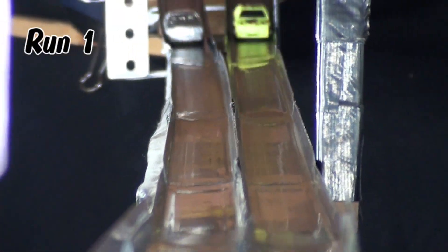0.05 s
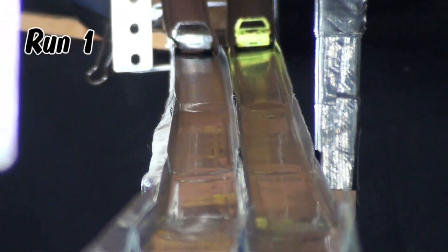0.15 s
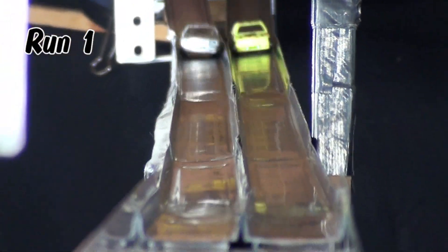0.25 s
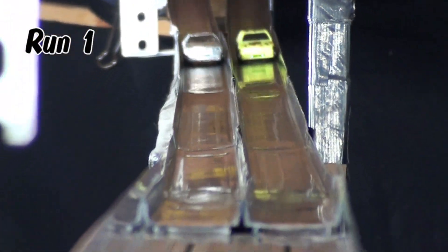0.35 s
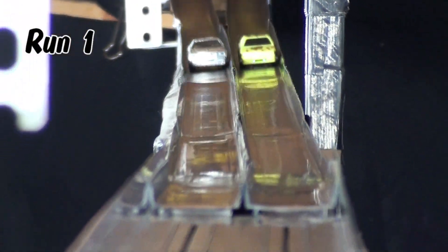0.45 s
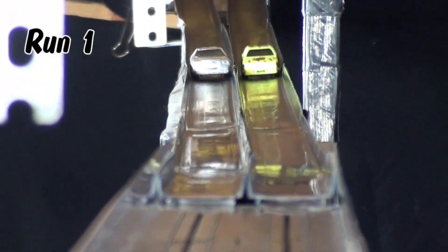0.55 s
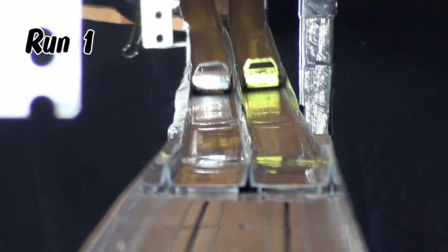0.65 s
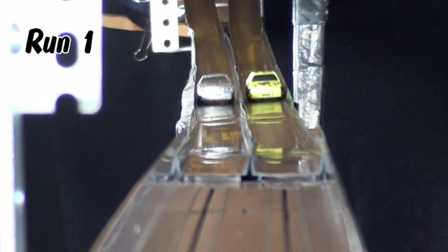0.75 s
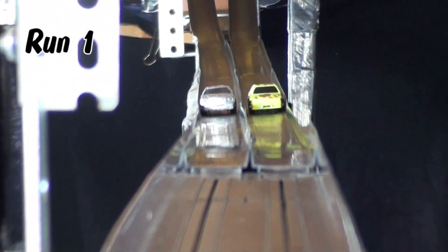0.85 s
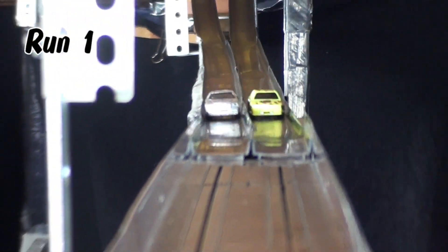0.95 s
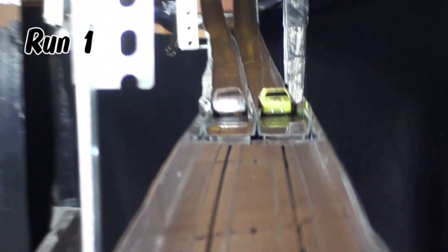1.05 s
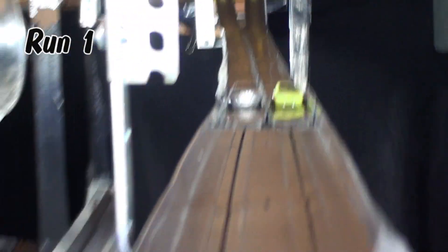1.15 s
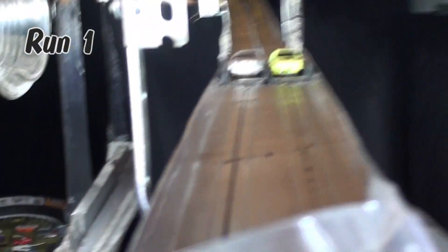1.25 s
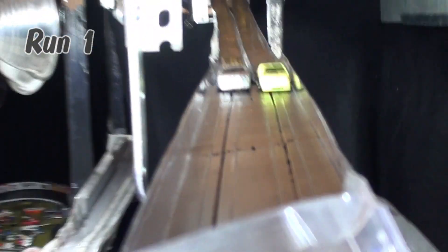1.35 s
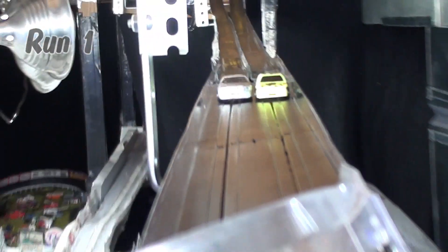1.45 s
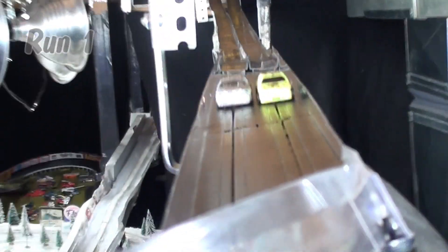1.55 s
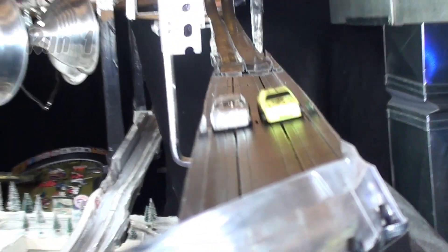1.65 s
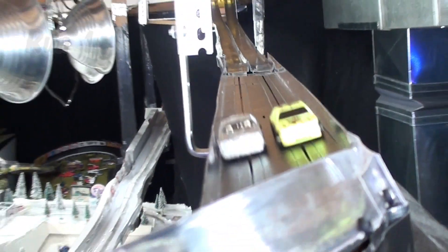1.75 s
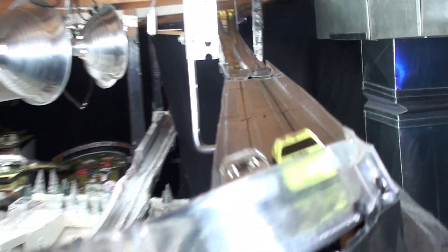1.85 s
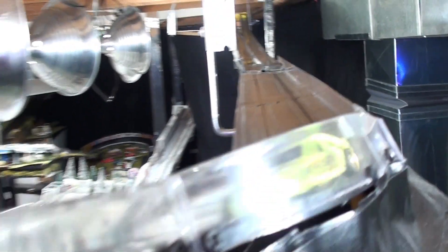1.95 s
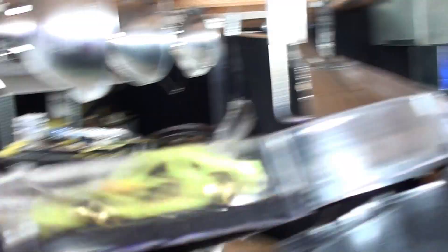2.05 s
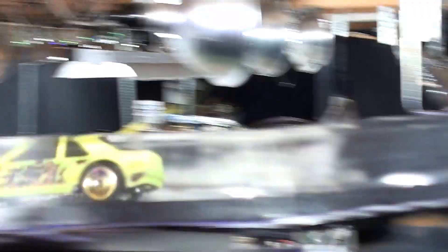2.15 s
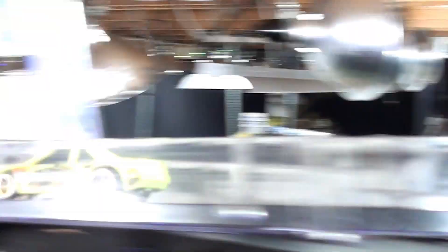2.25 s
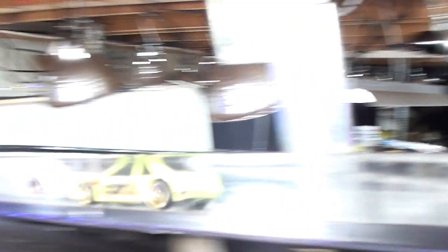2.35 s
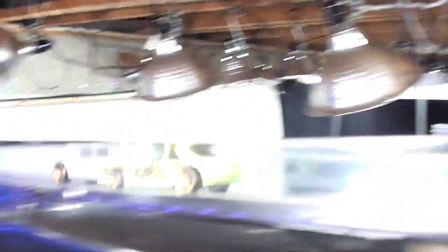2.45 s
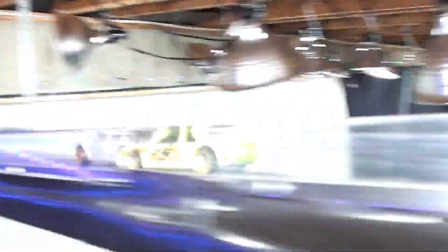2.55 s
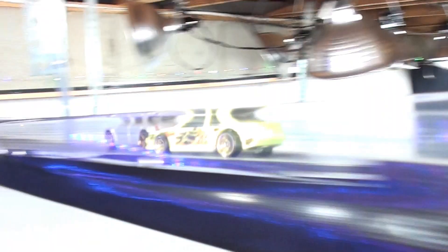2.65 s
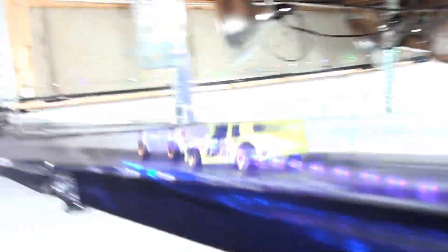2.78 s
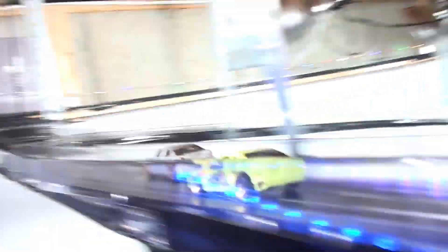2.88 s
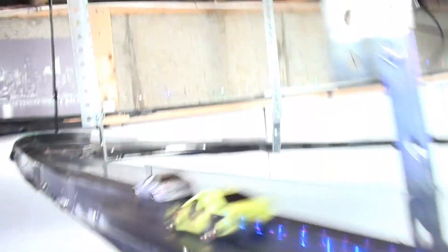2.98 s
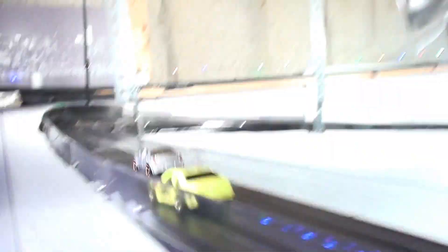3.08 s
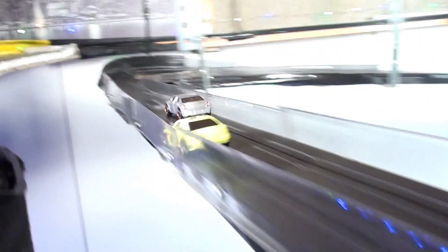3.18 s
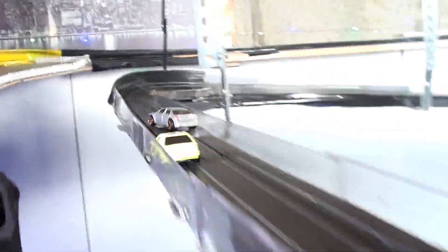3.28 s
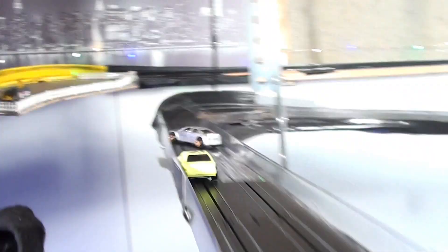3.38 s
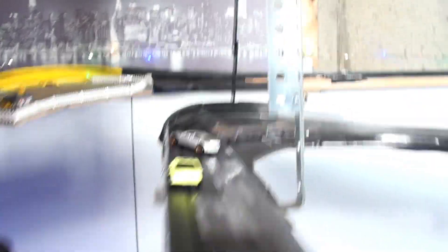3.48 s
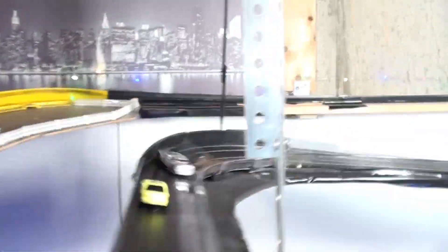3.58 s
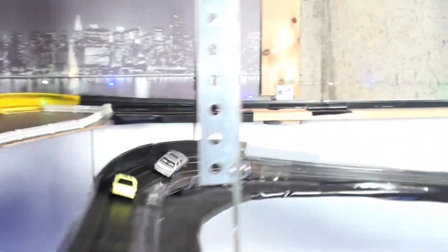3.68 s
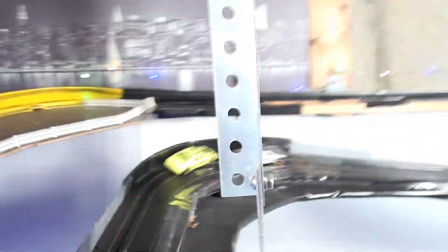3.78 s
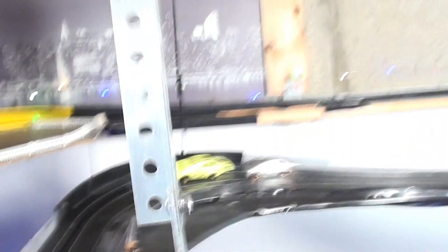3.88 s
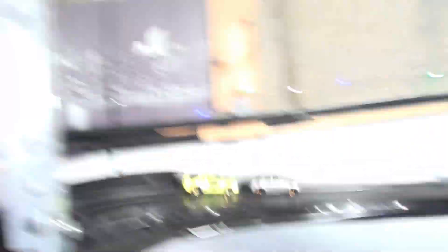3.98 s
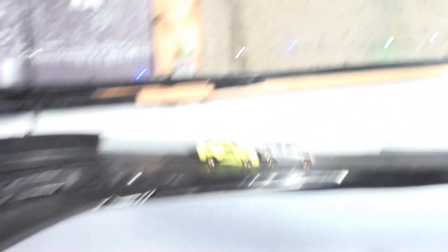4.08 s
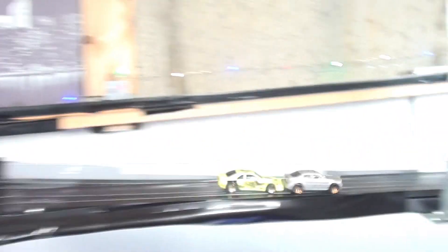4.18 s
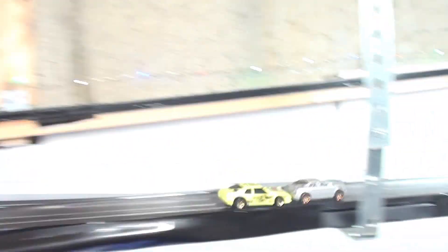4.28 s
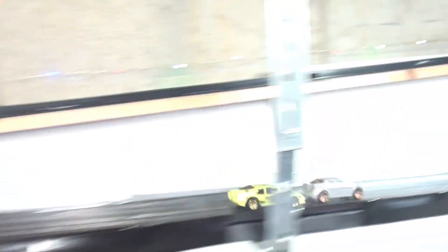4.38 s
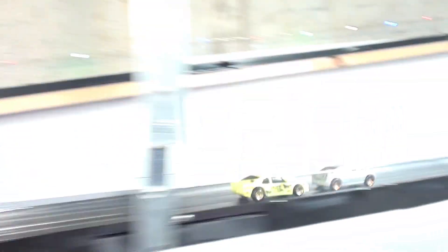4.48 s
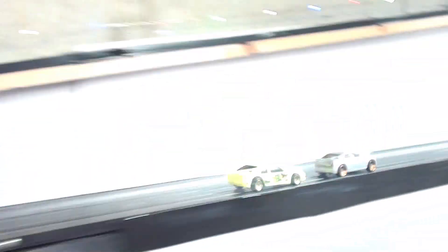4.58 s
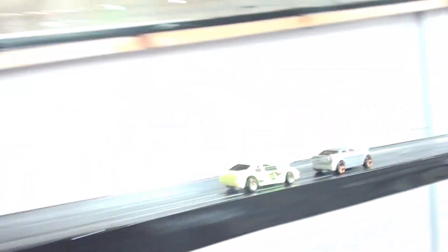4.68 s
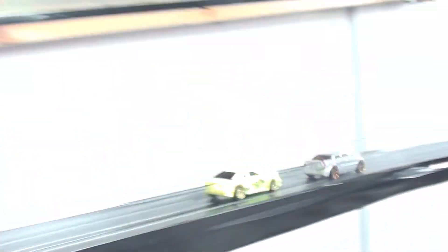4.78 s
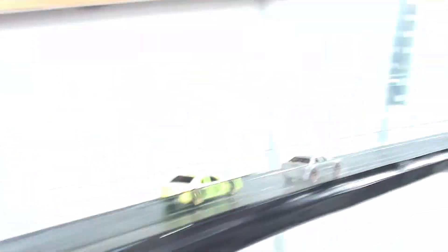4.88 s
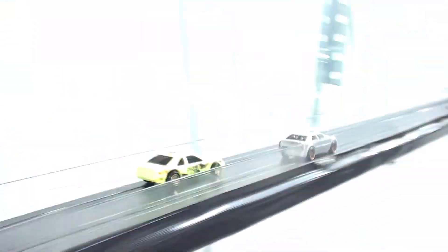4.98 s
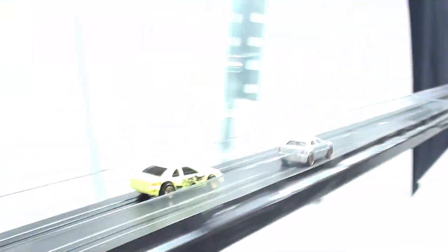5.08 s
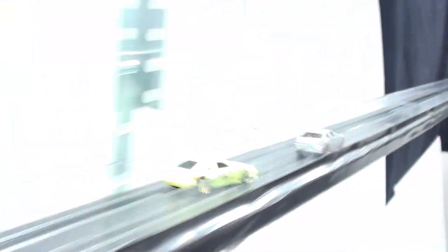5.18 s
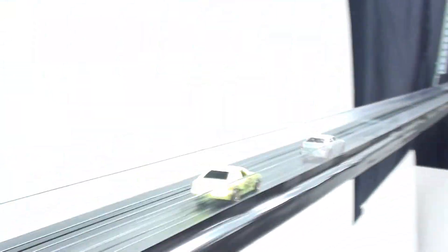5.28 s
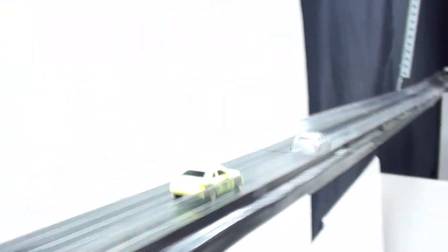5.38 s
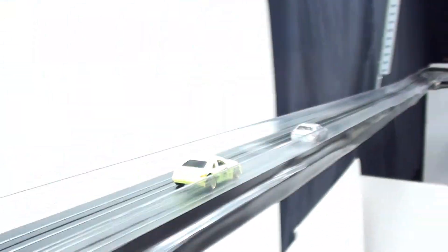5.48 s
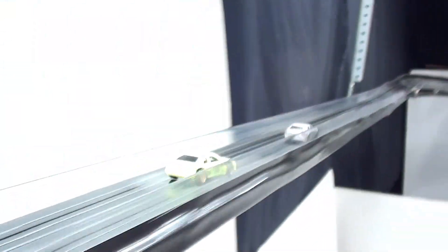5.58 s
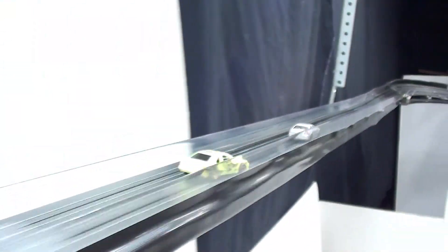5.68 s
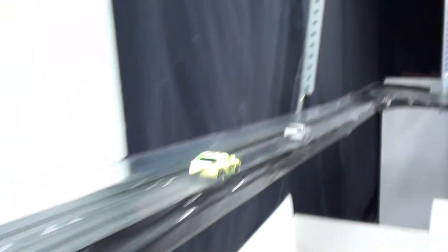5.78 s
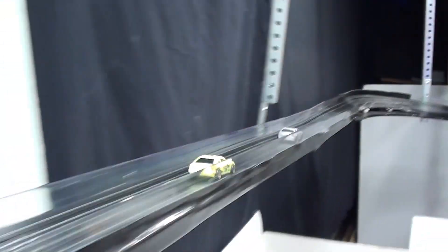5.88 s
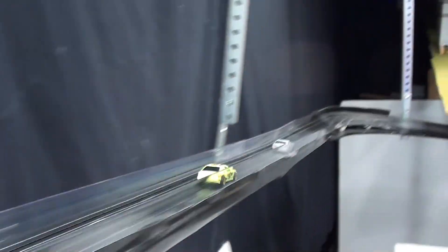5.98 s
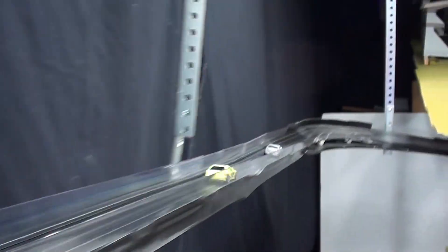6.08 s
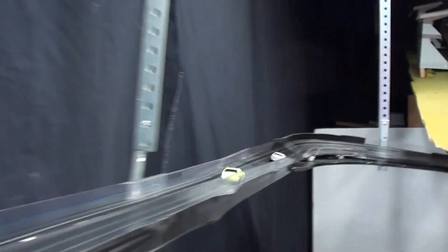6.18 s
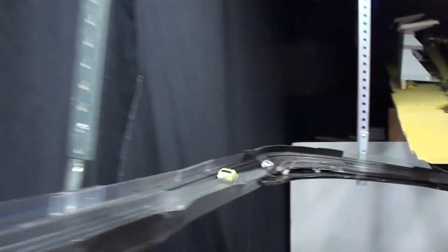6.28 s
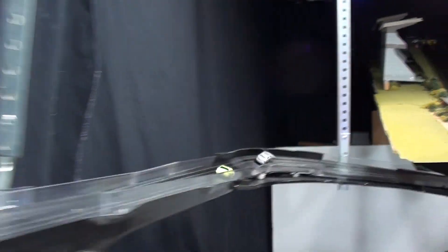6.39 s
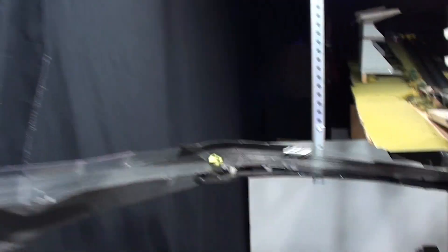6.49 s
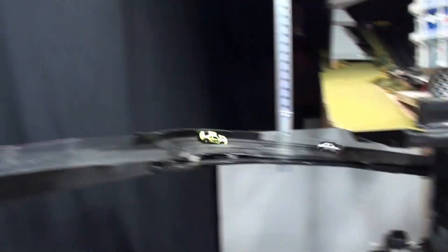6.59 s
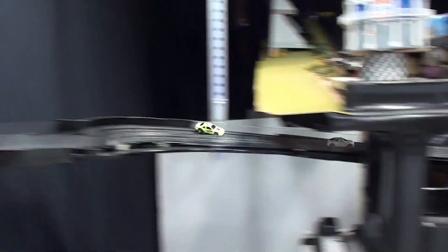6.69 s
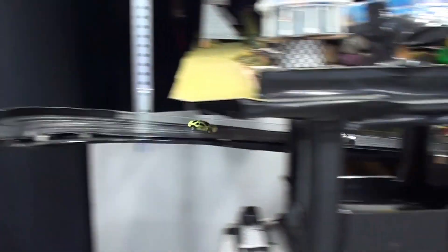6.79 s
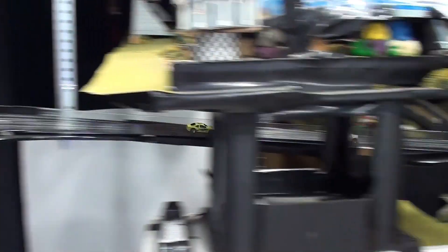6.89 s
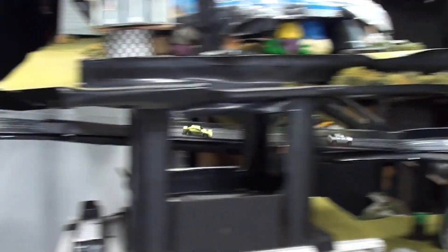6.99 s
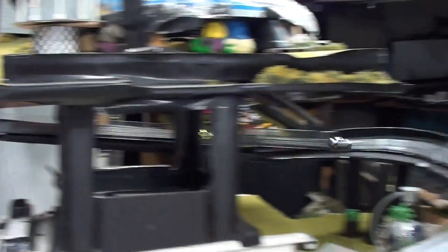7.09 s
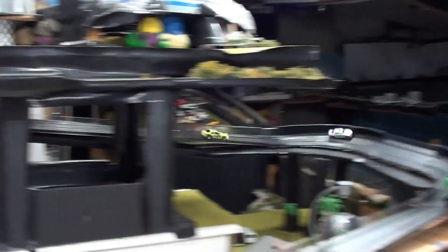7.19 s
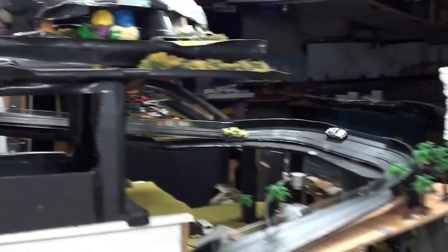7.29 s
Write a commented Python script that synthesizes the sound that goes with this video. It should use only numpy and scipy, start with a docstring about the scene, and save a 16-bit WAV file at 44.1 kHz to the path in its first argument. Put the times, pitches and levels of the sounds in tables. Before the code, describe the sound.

Two small diecast cars run down a plastic track indoors, picked up closely by a small microphone with little bass. From 0 to 1.4 seconds the roll is quiet, rattly and ringing, with a small double tick near 0.3, a soft thump at 0.85 and separate clicks from 1.1 to 1.45. Around 1.4 the gritty hiss jumps up and becomes a strong, bright stream. Between 2.0 and 2.3 a bend brings a rapid burst of ticks, knocks and brief gaps as the hiss dips. It runs full and smoother, loudest near 2.9, until a second bend at 3.6 to 4.05, with another dense clicking cluster. A clearer low thump comes at 4.4. The steady hiss then carries on with shifting hollow resonance, sparse ticks at 6.2, 6.5, 6.65 and 6.95, and a dull knock and slight dip near 7.25, still rolling at the end around 7.3. Faint lumpy stand rumble lies underneath.

```python
"""Indoors, two small diecast cars roll down a plastic track, heard from close behind.
Tiny wheel impacts make a gritty hiss that rings the track pieces; hops briefly cut it.
Bursts of tuned ringing make the axle ticks and car knocks, and now and then a soft thump of the stand.
Low, lumpy noise is the rumble of the stand, which shudders after each thump."""
import sys
import numpy as np
from scipy import signal
from scipy.io import wavfile
from scipy.ndimage import uniform_filter1d

SR = 44100
rng = np.random.default_rng(int(sys.argv[2]) if len(sys.argv) > 2 else 0)


def materialize(psi):
    """Save the field psi as 16-bit PCM at rate SR to the path in sys.argv[1].

    A 1-D psi becomes a single channel; in a 2-D psi each row is a channel.
    """
    bounded = np.clip(np.atleast_2d(psi).T, -1, 1)
    quanta = np.round(bounded * 32767).astype(np.int16)
    wavfile.write(sys.argv[1], SR, quanta)


N = 323694  # length in samples

# Ticks of the axles and track joints. Each row: start in seconds, peak of the tick in dB
# before its crack is added, level of the low knock in dB against that peak.
TICK_EVENTS = [(0.286, -23, -23), (0.321, -24, -20), (1.0755, -15, -10), (1.1924, -21, -17),
               (1.3103, -28, -9), (1.445, -15, -16), (2.012, -24, -8), (2.022, -14, -14),
               (2.064, -14.5, -11), (2.105, -15.5, -18), (2.12, -16, -11), (2.135, -24, -7),
               (2.151, -24, -12), (2.175, -22, -6), (2.2145, -21, -12), (2.255, -29, -5),
               (3.7905, -19, -17), (3.8143, -26, -13), (3.881, -17, -11), (3.898, -25, -18),
               (3.903, -19, -19), (3.929, -17, -7.5), (3.951, -31, 2), (3.975, -29, 3.5), (3.986, -32, -12),
               (4.0087, -13, -33), (4.0239, -23.5, -1), (4.052, -22, -6), (6.192, -20, -22),
               (6.5207, -14, -20), (6.654, -21.5, -4), (6.9398, -15.5, -28), (7.2512, -30, 10.5)]
# Jolts of the stand under the track. Each row: start in seconds, peak of its ring in dB before the soft rise,
# starting level of the body shudder in dB, the same for the deep sway in dB, shudder length in seconds.
STAND_JOLTS = [(0.298, -46, -50, -54, 0.095), (0.847, -23, -43, -55, .09), (1.41, -35, -47.5, -57, 0.17),
               (2.042, -42, -42.5, -57, 0.2), (3.65, -29, -45, -66, 0.13), (3.803, -30, -49, -61, 0.1),
               (4.409, -10, -40.5, -75, 0.06), (5.292, -50, -51, -62, .13), (6.434, -51, -42.5, -75, 0.17),
               (6.664, -42, -41.5, -75.5, 0.12), (6.96, -44, -44, -68, 0.071),
               (7.22, -34.5, -41, -77, 0.11)]

RAMP_END_S, RAMP_RATTLE = 1.6, 0.5  # end of the steep first ramp, and its share of chatter (0-1)
# Later chatter starts from a base share, grows with time as the cars slow, and rises in bends.
FLAT_RATTLE, RATTLE_PER_S, BEND_RATTLE = 0.16, 0.06, 0.8
BEND_SAG_DB, BEND_EXIT_S = -9.5, 0.11  # roll drop at full lean; time to run free after a bend
SHUDDER_RISE_S, SHUDDER_DB_PER_S = 0.01, -35
SETTLE_DB_PER_S = -300  # extra fading once the shudder length is over
DEEP_HZ = 91  # below it the whole frame of the stand sways
EDGE_HZ = 15850  # upper limit of the sound


def gain_of(db):
    """Turns decibels into amplitude."""
    return 10 ** (np.asarray(db) / 20)


def evened(x):
    """Scales a sound to an rms level of 1."""
    return x / np.sqrt(np.mean(x ** 2) + 1e-20)


def read(points, hz):
    """Reads a spectrum table at the given frequencies, with straight lines on a log scale."""
    f, value = np.transpose(points)
    return np.interp(np.log(hz + 1), np.log(f + 1), value)


def follow(rows, t):
    """Reads every column of a time table at the given times."""
    s, *columns = np.transpose(rows)
    return [np.interp(t, s, c) for c in columns]


def add(mix, s, sound):
    """Mixes a sound in at time s."""
    part = mix[round(s * SR):][:len(sound)]
    part += sound[:len(part)]


def wander(shape, size):
    """Makes smoothed random values of rms 1; size sets the patch extent along each axis."""
    x = rng.standard_normal(shape)
    for axis, n in enumerate(size):
        x = uniform_filter1d(x, n, axis=axis)
        x = uniform_filter1d(x, n, axis=axis)
    return evened(x)


def pair(first, second, hz, lean=0, spread_db=0):
    """Makes left and right spectra from a shared part plus and minus a side part that may lean to the left."""
    # Stereo width. Each row: frequency in Hz, side against middle in dB before spread_db is added.
    width = [(160, -30), (450, -18.5), (2000, -5), (3300, -9), (7000, -6.5), (8800, -17), (11000, -78)]
    side_gain = gain_of(read(width, hz)[:, None] + spread_db)
    side = side_gain * (second + lean * first)
    return np.array([first + side, first - side])


def rolling(patchy_db=1.96, drift_db=0.92, lean_per_db=0.3, airy_per_db=1.26):
    """Lets the contacts ring the track; its hollow lows and the wheel fizz change from piece to piece."""
    # Loudness of the roll. Each row: time in seconds, rolling level in dB before bends lower it,
    # hollow lows in dB and wheel fizz in dB, both against the rolling level.
    roll_levels = [(0, -53.5, 0.5, 3.5), (0.26, -44, -1, -5), (0.32, -39.5, -4, 0), (0.5, -42, -0.5, -4.5),
                   (0.9, -41, 1, -2), (1.04, -37.5, -2.5, -3), (1.1, -44, 0, -5), (1.398, -41.5, -0.5, -1),
                   (1.408, -32, -9.5, -0.5), (1.62, -27.5, -5.5, -3), (1.95, -29.5, -5, 0),
                   (2.26, -29, -6.5, -1), (2.45, -30, -3.5, -6), (2.9, -26.5, -6.5, -7),
                   (3.27, -30.5, -5.5, -1.5), (3.6, -29, -6.5, -2), (4.08, -32, -2, -1),
                   (4.2, -29, -3, -4.5), (4.85, -30, 0.5, -3.5), (5.05, -28, -8, -4.5),
                   (5.6, -31, -2.5, -1), (6.0, -29.5, -4.5, -1), (6.5, -31.5, -7, 1),
                   (7.24, -31.5, -7, -3.5), (7.26, -36, 3, 1), (7.34, -32.5, -1.5, 0)]
    # Tone of the roll before the rings and patches. Each row: frequency in Hz, level in dB per Hz.
    roll_colour = [(240, -43), (400, -24), (588, -22), (947, -8), (1480, -1), (2350, 0.5), (2950, 2),
                   (4350, 0), (4880, -2.5), (5450, 0), (7440, -3), (9510, -11.5), (15800, -34.5)]
    # Place of the roll between the ears. Each row: time in seconds, pull to the left in dB before
    # lean_per_db scales it, change of the stereo width in dB.
    aim = [(0, 0.5, -5), (1.6, -0.5, -11), (2.3, 1.5, -9.5), (2.8, -2, -8.5), (4.2, 0.7, -7),
           (5.6, 1.1, -7), (7.34, 0.0, -6.5)]
    hz, t, (track, wheels, axles) = signal.stft(contacts(), SR, nperseg=512, noverlap=384)
    level_db, hollow_db, fizz_db = follow(roll_levels, t)
    level_db = level_db + BEND_SAG_DB * lean_on_wall(t) ** 2

    low = 1 / (1 + (hz / 2300) ** 6)
    high = 1 / (1 + (5200 / (hz + 1)) ** 8)
    top = 1 / (1 + (7800 / (hz + 1)) ** 8)
    # axle snaps own the top of the fizz
    wheels = wheels * np.sqrt(1 - top)[:, None] + axles * top[:, None] ** 2

    rings = np.sqrt(track_ring(hz, t))
    shape = gain_of(read(roll_colour, hz))[:, None] * rings
    patches_db = patchy_db * wander(shape.shape, size=[2, 8]) / rings  # a ringing piece is steadier
    slow_db = drift_db * wander(shape.shape, size=[3, 50])
    shape *= gain_of(patches_db + slow_db)
    octaves_up = np.log2(np.maximum(hz / 6000, 1))[:, None]
    shape *= gain_of(airy_per_db * (fizz_db + 5.0) * octaves_up)  # strong fizz is also airier

    layers = (
        (1 - low - high, level_db, track),
        (low, level_db + hollow_db, track),
        (high, level_db + fizz_db, wheels),
    )
    sound = 0
    for part, db, drive in layers:
        tone = part[:, None] * shape
        steady = np.sqrt(uniform_filter1d((tone ** 2).mean(0), size=60))
        sound = sound + drive * tone / steady * gain_of(db)
    lean_db, spread_db = follow(aim, t)
    both = pair(*sound, hz, lean_per_db * lean_db, spread_db)
    return signal.istft(both, SR, nperseg=512, noverlap=384)[1][:, :N]


def contacts(chatter_db=3.5, bumps_per_s=300, bump_db=-1, bump_s=0.0014, track_share=0.61,
             press=0.82, press_s=0.0055, wheel_share=0.92, snap_share=1.8):
    """Drives the grit with bumps that die away; the heavy track follows least, the light axles most."""
    # Wheels leave the track for a moment. Each row: start in seconds, length in seconds, drop in dB.
    hops = [(1.042, 0.034, 3), (1.39, 0.014, 6.5), (2.079, 0.011, 5.5), (2.142, 0.0057, 9),
            (2.169, 0.017, 5.5), (2.218, 0.03, 4), (3.805, 0.0085, 8), (3.844, 0.0074, 1),
            (3.875, 0.008, 5), (4.044, 0.008, 4), (6.189, 0.027, 4.5), (6.511, 0.018, 2),
            (7.252, 0.0024, 15)]
    t = np.arange(N) / SR
    smooth = np.where(t < RAMP_END_S, RAMP_RATTLE, FLAT_RATTLE + RATTLE_PER_S * t)
    rattle = np.clip(smooth + BEND_RATTLE * lean_on_wall(t), 0, 1)

    hits = rng.random(N) < rattle ** 2 * bumps_per_s / SR
    strength = np.minimum(rng.exponential(1, N), 1.6)
    bumps = hits * strength * np.sqrt(rattle)
    fade_t = np.arange(2000) / SR
    swell = signal.oaconvolve(bumps, np.exp(-fade_t / bump_s))[:N]
    for s, *_ in TICK_EVENTS:  # each tick also presses the wheels down for a moment
        add(swell, s, press * np.exp(-fade_t / press_s))
    chatter = gain_of(chatter_db * rattle * wander(N, size=[160]))
    force = chatter * (1 + gain_of(bump_db) * swell)

    # each bump starts with an axle snap
    snap = signal.oaconvolve(bumps, np.exp(-np.arange(300) / (0.00096 * SR)))[:N]
    forces = np.array([force ** track_share, force ** wheel_share, force * (1 + snap_share * snap)])
    forces /= np.sqrt(uniform_filter1d(forces ** 2, size=4000))  # keeps the slow level even
    for s, length, drop_db in hops:
        # the force fades as the wheel lifts and returns at once on landing
        lifted = np.clip((t - s) / 0.00081, 0, 1) * (t < s + length)
        forces *= gain_of(-drop_db * lifted)
    return grit() * forces[:, None]


def grit(fine_db=1.5):
    """Makes dense wheel noise, combed by many narrow peaks that shift as the cars move on."""
    z = signal.stft(rng.standard_normal((2, N)), SR, nperseg=4096)[2]
    z = z * gain_of(fine_db * wander(z.shape[1:], size=[2, 2]))
    return evened(signal.istft(z, SR, nperseg=4096)[1][:, :N])


def track_ring(hz, t, sharpness=10, ramp_sharpness=20, fade_s=0.11):
    """Gives the power gain of the ringing track pieces; those on the ramp ring more narrowly."""
    # Each piece has its own pitch, which slides as the cars cross it. Each row: start in seconds,
    # end in seconds, first pitch in Hz, last pitch in Hz, strength in dB against the plain roll.
    pieces = [(-.05, 0.305, 2260, 2200, 9.5), (0.13, .45, 1820, 1720, 7), (0.27, 0.5, 4200, 3920, 6),
              (0.436, 0.848, 3830, 3830, 11), (1.555, 1.987, 1650, 2100, 3.5), (2.35, 3.3, 1520, 1470, 6),
              (2.303, 3.202, 2470, 2970, 5.5), (2.45, 3.1, 3800, 4500, -1), (3.557, 3.65, 2060, 2150, 14),
              (4.136, 4.347, 895, 920, 9.5), (4.184, 4.903, 5460, 5830, 2.5), (4.726, 5.2, 1620, 1220, 8),
              (5.45, 6.04, 1500, 1480, 3.5), (5.75, 6.42, 3620, 4000, 1.5)]
    power = 1
    for start, end, first_hz, last_hz, db in pieces:
        on_it = np.clip(np.minimum(t - start, end - t) / fade_s + 0.5, 0, 1)
        ring_hz = np.interp(t, [start, end], [first_hz, last_hz])
        narrow = ramp_sharpness if end < RAMP_END_S else sharpness
        hump = 1 / (1 + (2 * narrow * (hz[:, None] / ring_hz - 1)) ** 2)
        power = power + gain_of(2 * db) * hump * on_it
    return power


def lean_on_wall(t):
    """Tells how hard the cars press on a bend's wall, 0-1: more and more, then they run free."""
    # Each row: entering time in seconds, leaving time in seconds, tightness from 0 to 1.
    bends = [(1.745, 2.239, 0.73), (3.578, 4.05, 0.74), (6.204, 6.63, 0.27)]
    lean = 0
    for enter, leave, tight in bends:
        building = (t - enter) / (leave - enter)
        releasing = 1 + (leave - t) / BEND_EXIT_S
        lean = lean + tight * np.clip(np.minimum(building, releasing), 0, 1)
    return lean


def ring(modes, length_s=0.055, scrape=0.56, *, size=12):
    """Rings a set of modes with one blow, a little different each time and roughened by the scrape."""
    t = np.arange(round(length_s * SR)) / SR
    detune, turn = rng.uniform(0.92, 1.08, len(modes)), rng.random(len(modes))
    rough = 1 + scrape * wander((len(modes), len(t)), size=[1, size])
    sound = 0
    for (hz, db, t60), d, p, r in zip(modes, detune, turn, rough):
        fading = gain_of(db - 60 * t / t60)
        sound = sound + fading * r * np.sin(2 * np.pi * (hz * d * t + p))
    return sound / abs(sound).max()


def ticks(aside_db=0.5, crack=0.62, crack_s=0.00047):
    """Joins a central noise crack and bright axle tick with a duller knock of the car on the track wall."""
    # Each row of both tables: pitch in Hz before a random detune, strength in dB against the other
    # modes, time to fade by 60 dB in seconds. First the axle, then the car on the wall.
    tick_modes = [(5520, 3, 0.0065), (7500, -1.5, 0.023), (8900, -1.5, 0.013), (10960, -7, 0.0096)]
    knock_modes = [(1133, -2.5, 0.048), (1750, -1.5, 0.017), (2940, -14, 0.012)]
    left, right = np.zeros((2, N))
    for s, db, knock_db in TICK_EVENTS:
        tick = ring(tick_modes)
        knock = gain_of(db + knock_db) * ring(knock_modes, scrape=0.53, size=40)
        burst = rng.standard_normal(len(tick)) * np.exp(-np.arange(len(tick)) / (crack_s * SR))
        burst = burst - uniform_filter1d(burst, size=24)  # the crack has no bass
        tick = gain_of(db) * (tick + crack * burst)
        # each knock is set a little to one side at random; the tick stays central
        knock_side_db = aside_db * rng.uniform(-0.51, 1)
        add(left, s, tick + knock * gain_of(knock_side_db))
        add(right, s, tick + knock * gain_of(-knock_side_db))
    return np.array([left, right])


def thumps(rise_s=0.01, scrape=0.3):
    """Makes soft low blows: a slow rise into the rough, short ring of the stand."""
    # Each row: pitch in Hz before a random detune, strength in dB against the other modes,
    # time to fade by 60 dB in seconds.
    stand_modes = [(334, 1, 0.046), (429, -15, 0.081), (625, -14, 0.076)]
    out = np.zeros(N)
    for s, db, *_ in STAND_JOLTS:
        blow = ring(stand_modes, 0.22, scrape, size=400)
        rise = (1 - np.exp(-np.arange(len(blow)) / (rise_s * SR))) ** 2
        add(out, s, gain_of(db) * blow * rise)
    return out


def rumble(lumpy_db=2.5):
    """Makes the stand's low, lumpy noise; a jolt makes it shudder for a while, then it settles quickly."""
    # Steady part. Each row: time in seconds, body level in dB, deep bass level in dB.
    rumble_levels = [(0, -50.5, -63), (1.03, -52, -61), (1.08, -56, -68), (2.5, -51.5, -72),
                     (4.35, -52.5, -62), (4.5, -61, -78), (6.4, -55, -70), (7.34, -49.5, -65)]
    # Tone before the lumps are added. Each row: frequency in Hz, level in dB per Hz.
    rumble_colour = [(20, -37), (60, -24), (145, -7), (330, 2), (500, -2.5), (700, -2), (1000, -16)]
    noise = rng.standard_normal((2, N))
    hz, _, (first, second) = signal.stft(noise, SR, nperseg=2048, noverlap=1536)
    lumps_db = lumpy_db * wander(first.shape, size=[5, 3])
    lumps = gain_of(read(rumble_colour, hz)[:, None] + lumps_db)
    deep = 1 / (1 + (hz / DEEP_HZ) ** 6)[:, None]
    split = np.array([1 - deep, np.sqrt(deep)])[:, None]  # body, then deep bass
    bands = pair(first, second, hz) * lumps * split
    bands = signal.istft(bands, SR, nperseg=2048, noverlap=1536)[1][..., :N]

    t = np.arange(N) / SR
    power = gain_of(2 * np.array(follow(rumble_levels, t)))
    for s, _, body_db, deep_db, length in STAND_JOLTS:
        fade_db = SHUDDER_DB_PER_S * np.maximum(t - s, 0)
        fade_db = fade_db + SETTLE_DB_PER_S * np.maximum(t - s - length, 0)
        rise = np.clip((t - s) / SHUDDER_RISE_S, 0, 1)
        power = power + rise * gain_of(2 * (np.array([[body_db], [deep_db]]) + fade_db))
    return sum(evened(band) * np.sqrt(p) for band, p in zip(bands, power))


def scene():
    """Adds up the rolling cars, their ticks, and the thumps and rumble of the stand."""
    return rolling() + ticks() + thumps() + rumble()


def record(dry, ceiling=0.28, bass_hz=45):
    """Acts as a small microphone: it loses deep bass, overloads softly and cuts the highest treble."""
    thin = signal.sosfilt(signal.butter(2, bass_hz, "high", fs=SR, output="sos"), dry)
    soft = ceiling * np.tanh(thin / ceiling)
    band_limit = signal.firwin(511, EDGE_HZ, window=("kaiser", 9), fs=SR)
    return signal.oaconvolve(soft, band_limit[None], "same")


dry = scene()
out = record(dry)
materialize(out)
```